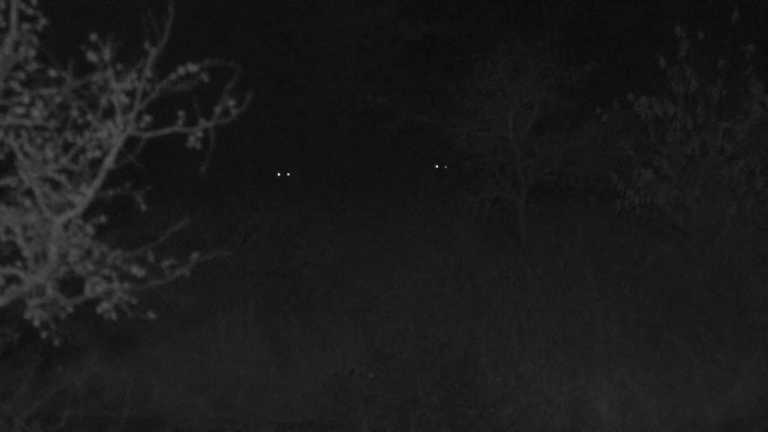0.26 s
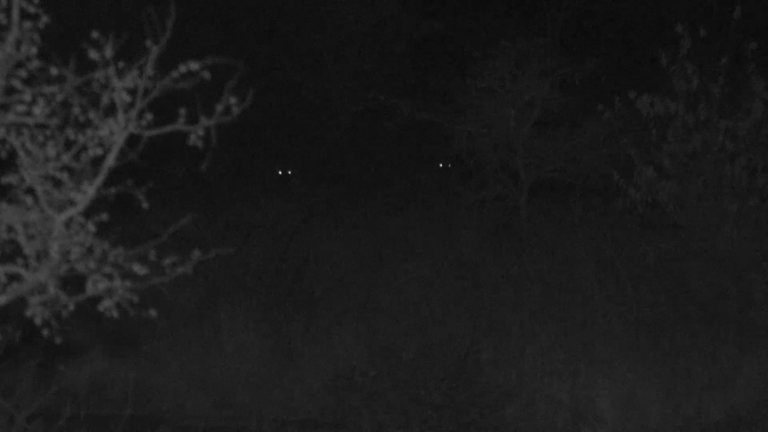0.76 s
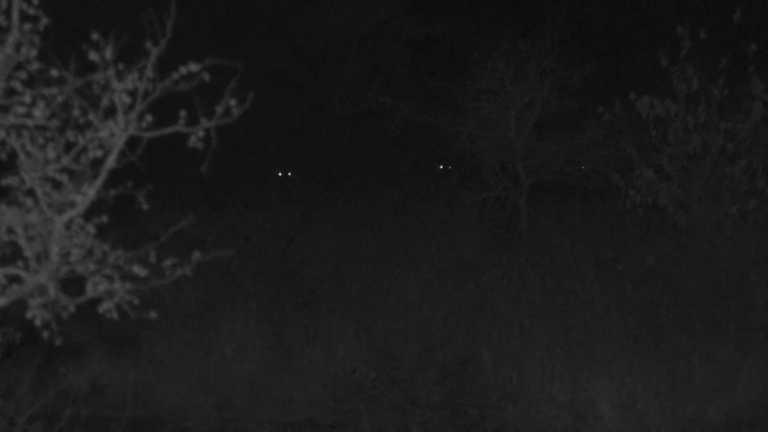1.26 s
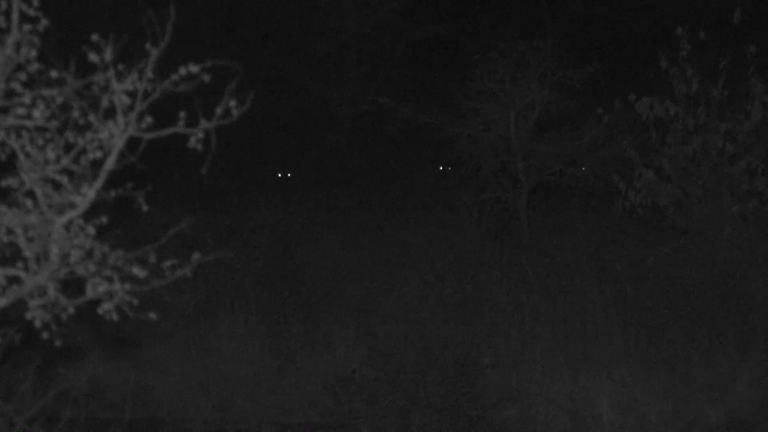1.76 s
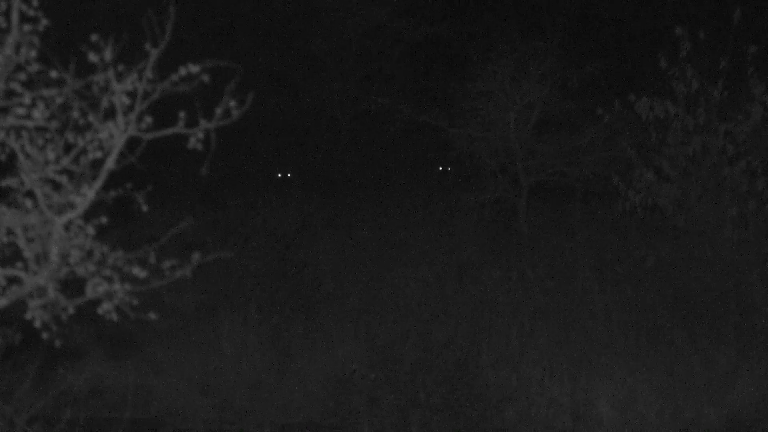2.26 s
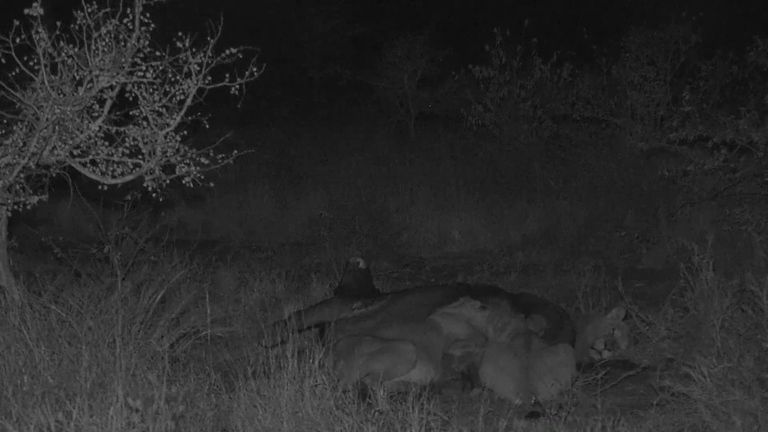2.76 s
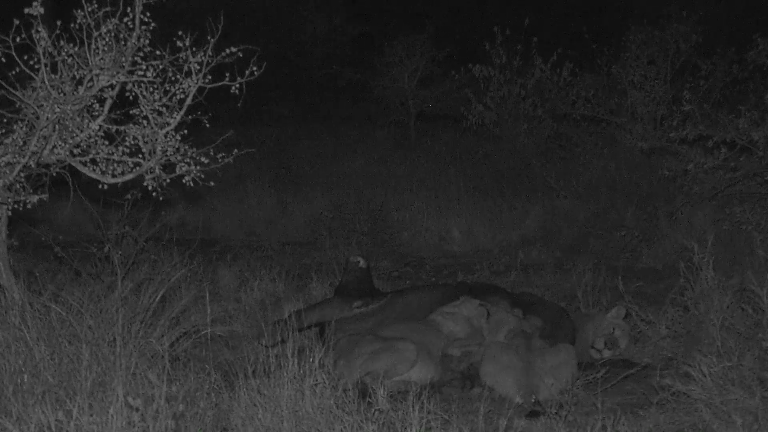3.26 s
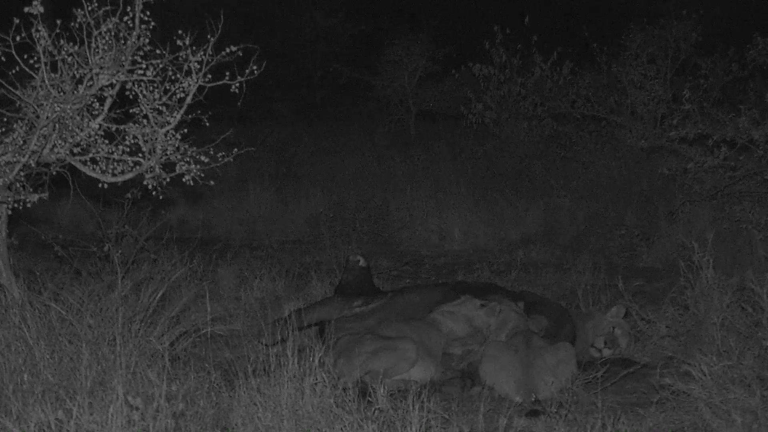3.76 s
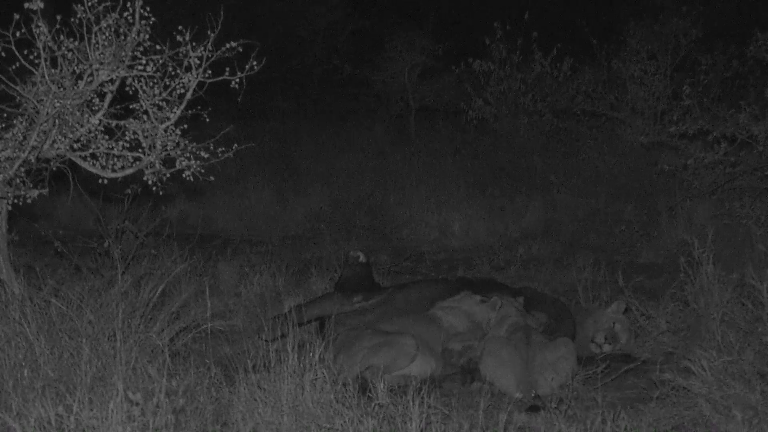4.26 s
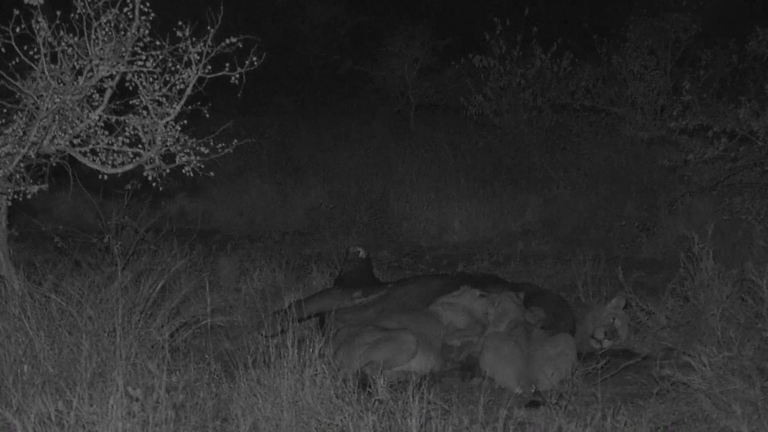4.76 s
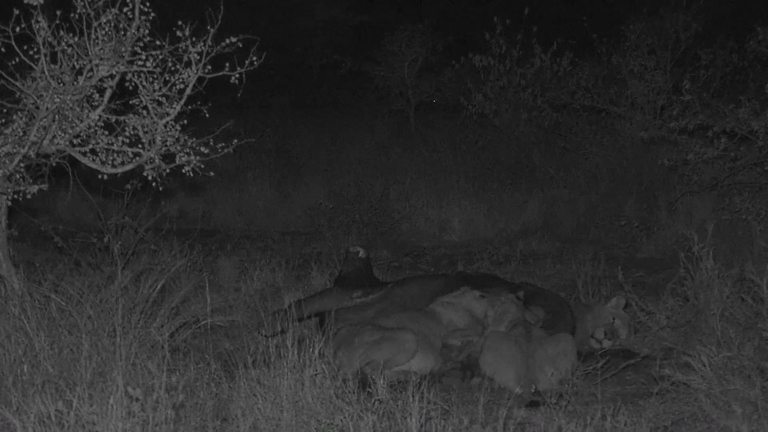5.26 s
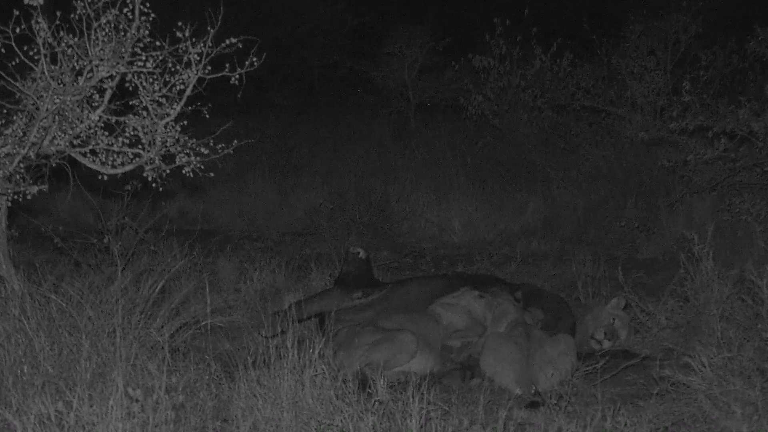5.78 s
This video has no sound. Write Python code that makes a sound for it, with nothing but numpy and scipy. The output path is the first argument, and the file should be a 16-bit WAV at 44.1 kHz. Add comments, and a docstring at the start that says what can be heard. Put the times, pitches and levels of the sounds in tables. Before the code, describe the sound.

Two hyenas call outdoors in the dark. The clear, strong whoops come at the start and again past the middle, each held and roughened before a fast upward sweep and abrupt stop, with a long diffuse echo from trees. Between and beneath them, quieter low groans rise and sink, the last one strongest. Crisp grass brushing and sharp little snaps sound near the microphone above a soft, dull background hiss.

```python
"""Two hyenas calling at night

In open bush one hyena whoops: long clear notes sweep up and break off, roughened by a second oscillation.
The other lows in arched groans, a buzz of partials shaped by its throat. Trees return echoes and a long tail.
Shaped noise makes the night air and the rustle of dry grass; short noise bursts make its stalks snap."""
import sys
import numpy as np
from scipy import signal
from scipy.io import wavfile
from scipy.ndimage import uniform_filter1d

SR = 44100
rng = np.random.default_rng(int(sys.argv[2]) if len(sys.argv) > 2 else 0)


def int16_out(signal):
    """Quantize to a 16-bit WAV file."""
    q = np.round(np.clip(np.atleast_2d(signal).T, -1, 1) * 32767)
    wavfile.write(sys.argv[1], SR, q.astype(np.int16))


N = 265526  # length in samples
LEAD = SR // 2  # run-up in samples: the first whoop is already sounding and has filled the tail
VOICE_SR = SR // 3  # voices are computed at this lower sample rate, Hz


def amp(db):
    """Turns decibels into a plain factor."""
    return 10 ** (np.asarray(db) / 20)


def unit(x):
    """Scales a sound to an rms of 1."""
    return x / np.sqrt(np.mean(x ** 2) + 1e-20)


def read(points, hz):
    """Reads a curve of (frequency, value) points, with frequency on a logarithmic scale."""
    point_hz, value = np.transpose(points)
    return np.interp(np.log(hz + 1), np.log(point_hz + 1), value)


def add(mix, start_s, sound):
    """Adds a sound to the mix at its start time, cutting it off at the end of the mix."""
    part = mix[LEAD + round(start_s * SR):][:len(sound)]
    part += sound[:len(part)]


def wander(size, hz, rate=VOICE_SR):
    """Smooth chance of rms 1: random numbers with changes faster than about hz filtered out."""
    step = 8  # one random number per 8 samples
    smooth = signal.butter(4, hz, fs=rate / step, output="sos")
    slow = signal.sosfilt(smooth, rng.standard_normal(size // step + 2))
    return unit(np.interp(np.arange(size) / step, np.arange(len(slow)), slow))


def shake(size, rasp_db, hz):
    """Rasp: irregular size (real part) and timing (imaginary part) of the vocal pulses."""
    return amp(rasp_db) * (wander(size, hz) + 1j * wander(size, hz))


def sounded(t, voice, fade_s):
    """Fades a voice in and out; returns its start time and its sound at the full sample rate."""
    edges = np.minimum(np.minimum(t - t[0], t[-1] - t) / fade_s, 1)
    return t[0], signal.resample_poly(voice.real * edges, SR // VOICE_SR, 1)


def whoop(rows, lead_s, fade_s, join_s, leave_s, slow_hz, full_db):
    """A clear tone; on the held note a second, slower oscillation adds sum and difference tones."""
    # How the throat favours some pitches. Each row: frequency in Hz, level in dB.
    whoop_throat = [(100, -36), (200, -13.5), (400, 8), (550, 10.5), (720, 5.5), (860, 15), (1070, 2.5),
                    (1250, -5.5), (1430, 5.5), (1600, -3.5), (1780, -8.5), (2150, -14), (2600, -29),
                    (3100, -35), (3500, -35.5), (4000, -37), (4400, -56), (5300, -48), (6200, -61)]
    # Sum and difference tones. Each entry: multiple of the slow oscillation, level in dB before coupling.
    side_tones = {-3: -10.5, -2: -3.5, -1: -5, 1: 0.29, 2: -26}
    join_ramp_s, leave_ramp_s, roughen_s = .06, .12, .3
    uncoupled_db = -36
    clear_rasp_db, join_rasp_db, double_rasp_db, sweep_rasp_db = -50, -42.5, -20, -15.5
    slow_lift_hz = 9.92  # the sweep pulls the slow oscillation up

    s, *columns = np.transpose(rows)
    t = np.arange(s[0] - lead_s, s[-1], 1 / VOICE_SR)
    hz, first_db, second_db, tilt_db = (np.interp(t, s, c) for c in columns)

    # The slow oscillation joins, then its side tones sink again as it leaves.
    joined = np.clip((t - join_s) / join_ramp_s, 0, 1)
    roughened = np.clip((t - join_s) / roughen_s, 0, 1)
    swept = np.clip((t - leave_s) / leave_ramp_s, 0, 1)
    couple_db = uncoupled_db + (full_db - uncoupled_db) * joined * (1 - swept)

    # The rasp builds after the joining and grows once more with the sweep.
    rasp_db = clear_rasp_db + (join_rasp_db - clear_rasp_db) * joined
    rasp_db = rasp_db + (double_rasp_db - join_rasp_db) * roughened
    rasp_db = rasp_db + (sweep_rasp_db - double_rasp_db) * swept
    rasp = shake(len(t), rasp_db, 65.5)

    # Both oscillations waver slightly in pitch.
    slow_hz = slow_hz + slow_lift_hz * swept
    fast_turns = np.cumsum(hz * (1 + 0.0028 * wander(len(t), 21.7))) / VOICE_SR
    slow_turns = np.cumsum(slow_hz * (1 + 0.005 * wander(len(t), 8.4))) / VOICE_SR
    fast, slow = np.exp(2j * np.pi * fast_turns), np.exp(2j * np.pi * slow_turns)

    voice = amp(first_db) * fast * (1 + rasp)
    base_db = second_db - read(whoop_throat, 2 * hz)  # the second partial sets the level of the rest
    sides = {n: slow ** n for n in (0, *side_tones)}
    multiple = np.ones(len(t))  # the fast oscillation raised to the power k
    for k in range(13):
        patchy_db = 0.87 * np.sqrt(k) * wander(len(t), 8.6)  # the higher partials come and go
        for n, side_db in {0: 0, **side_tones}.items():
            line_hz = k * hz + n * slow_hz
            if (k, n) != (1, 0) and line_hz.min() > 0:  # the first partial is already there
                line_db = base_db + read(whoop_throat, line_hz) + tilt_db * np.log2(line_hz / hz / 2)
                line_db = line_db + patchy_db * (k > 2) + (side_db + couple_db) * (n != 0)
                phase = np.exp(2j * np.pi * rng.random())
                line = amp(line_db) * (line_hz < 6500) * multiple * sides[n] * phase
                # Each tone takes the rasp at its own time shift, and more of it up high.
                voice = voice + line * (1 + 0.97 * k * np.roll(rasp, 300 * (k + 13 * n)))
        multiple = multiple * fast
    return sounded(t, np.sqrt(2) * voice, fade_s)


def partials(hz, turns, throat, tilt_db, odd_db, rasp, key, count):
    """Multiples of hz through the throat, tilted about multiple key; rasp shakes each pulse, more so up high."""
    out = 0
    for k in range(1, count + 1):
        db = read(throat, k * hz) + tilt_db * np.log2(k / key) + odd_db * (k % 2)
        db = db + 3.94 * wander(len(hz), 6.94) * (k > 3)  # the higher partials come and go
        tone = np.exp(2j * np.pi * (k * turns + rng.random()))
        out = out + amp(db) * tone * (1 + rasp * np.sqrt(k / key)) * (k * hz < 6000)
    return np.sqrt(2) * out


def groan(rows, taut_tilt_db):
    """A low buzz, its second partial favoured by the throat; slack folds rasp, and odd partials can fade."""
    # How the throat favours some pitches. Each row: frequency in Hz, level in dB.
    groan_throat = [(80, -17), (150, -22), (220, -2.5), (300, 6), (420, -11), (600, -26.5), (750, -30.5),
                    (900, -14.5), (1000, -14), (1100, -12), (1200, -27), (1400, -35), (1750, -34.5),
                    (2200, -56), (6000, -51)]
    slack_hz, taut_hz = 81, 146  # the creaky ends and the full pitch
    slack_tilt_db = 4  # brightness of the creaky ends, dB per octave
    slack_rasp_db, taut_rasp_db = -17, -35.5
    close_hz, close_span_hz, close_tilt_db = 88.5, 6.5, -9  # tilt change in dB per octave

    s, *columns = np.transpose(rows)
    t = np.arange(s[0], s[-1], 1 / VOICE_SR)
    hz, effort_db, odd_db = (np.interp(t, s, c) for c in columns)
    taut = np.clip((hz - slack_hz) / (taut_hz - slack_hz), 0, 1)
    tilt_db = slack_tilt_db + (taut_tilt_db - slack_tilt_db) * taut
    rasp_db = slack_rasp_db + (taut_rasp_db - slack_rasp_db) * taut

    # Past the highest pitch, as the groan sinks low, the mouth closes and the sound darkens.
    closing = np.clip((close_hz - hz) / close_span_hz, 0, 1) * (t > t[hz.argmax()])
    tilt_db = tilt_db + close_tilt_db * closing

    turns = np.cumsum(hz * (1 + 0.0041 * wander(len(t), 20.5))) / VOICE_SR
    rasp = shake(len(t), rasp_db, 74)
    voice = partials(hz, turns, groan_throat, tilt_db, odd_db, rasp, key=2.4, count=22)
    return sounded(t, amp(effort_db) * voice, 0.046)


def bush(x, wet_db):
    """Scattering from trees: a diffuse tail that builds up and dies away, and a few smeared echoes."""
    # The tail by pitch. Each row: frequency in Hz, time to fall by 60 dB in seconds, relative level in dB.
    tail_colour = np.array([(199, 1.2, -4), (386, 2.17, -3.5), (850, 2.7, 0), (1360, 2.37, 0.5),
                            (1790, 1.94, 0.5), (2650, 1.53, 6.5), (3600, 1.73, 4), (6100, 1.2, 0)])
    # Echoes. Each row: delay in seconds, level in dB before the wet level and a common lift are added.
    echo_list = [(0.078, -18.5), (0.138, -35), (0.364, -26.5), (.62, -40)]
    build_s, smear_s, echo_lift_db = 0.011, 0.0031, 14
    size = 2 * SR

    # One click of random sign at a random place in every 20 samples.
    taps = np.zeros(size)
    at = np.arange(0, size, 20)
    taps[at + rng.integers(0, 20, len(at))] = rng.choice([-1., 1.], len(at))

    hz, t, z = signal.stft(taps, SR, nperseg=512)
    t60 = read(tail_colour[:, [0, 1]], hz)[:, None]
    colour_db = read(tail_colour[:, [0, 2]], hz)[:, None]
    z = z * amp(colour_db - 60 * t / t60) * (1 - np.exp(-t / build_s))
    tail = signal.istft(z, SR, nperseg=512)[1][:size]
    tail = amp(wet_db) * tail / np.linalg.norm(tail)

    age = np.arange(size) / SR
    for delay_s, db in echo_list:
        clump = taps * np.exp(-((age - delay_s) / smear_s) ** 2)
        tail = tail + amp(db + wet_db + echo_lift_db) * clump / np.linalg.norm(clump)
    return x + signal.fftconvolve(x, tail)[:len(x)]


def hiss(colour, patchy_db):
    """Noise of a given colour and rms 1, with patches of pitch and time that drift in level."""
    hz = np.fft.rfftfreq(512, 1 / SR)
    a, b, patches = rng.standard_normal((N // 128 + 5, 257, 3)).T
    patches = uniform_filter1d(patches, 10, 0)  # smooth across pitch
    patches = unit(uniform_filter1d(patches, 16, 1))  # smooth across time
    z = (a + 1j * b) * amp(read(colour, hz)[:, None] + patchy_db * patches)
    return unit(signal.istft(z, nperseg=512, noverlap=384)[1][:N])


def night():
    """The steady background of the night: coloured noise."""
    # Colour of the noise. Each row: frequency in Hz, relative level in dB per Hz.
    night_colour = [(24, -49), (40, -15.5), (243, -4), (412, -2.5), (680, -6), (918, -5.5), (1210, -10),
                    (2700, -14.5), (6650, -21), (9220, -23), (16000, -24)]
    night_db = -58.5
    return amp(night_db) * hiss(night_colour, 1.44)


def grass():
    """Brushed stalks: hiss that swells, sprinkled with tiny crackles."""
    # Colour of the hiss. Each row: frequency in Hz, relative level in dB per Hz.
    grass_colour = [(1500, -19), (2500, -9.5), (3500, -9.5), (4400, -4), (5300, -5), (6100, -3), (7200, -4),
                    (9200, 0), (10600, -3), (11600, -11.5), (13200, -14), (14300, -21), (16000, -10.5)]
    # Brushes. Each row: peak time in seconds, peak level in dB, rise in seconds, fall in seconds.
    brush_list = [(.03, -59, 0.009, 0.011), (.12, -60, 0.034, 0.035), (.32, -60, 0.07, .2),
                  (1.24, -68.5, 0.07, 0.37), (2.09, -60.5, 0.026, 0.025), (2.16, -68, 0.032, .03),
                  (2.36, -49, 0.077, 0.053), (2.44, -50.5, .05, 0.089), (2.72, -59.5, .03, .12),
                  (3.07, -55, 0.11, 0.18), (3.26, -59.5, 0.057, 0.076), (3.55, -62.5, 0.21, 0.27),
                  (3.82, -56.5, 0.12, 0.22), (4.02, -51.5, 0.16, 0.095), (4.22, -52.5, 0.092, .1),
                  (4.43, -53, .1, 0.036), (4.66, -51.5, 0.065, .05), (4.93, -56, .3, 0.48),
                  (5.33, -52.5, 0.057, 0.06), (5.54, -50.5, .02, 0.07), (5.64, -47.5, 0.065, 0.12),
                  (5.83, -46.5, 0.026, 0.12)]
    still_db = -69.5  # level between brushes
    drop_db = -7.5  # change one rise or fall away from a peak
    ticks_per_s, tick_decay_s = 250, 0.00088

    t = np.arange(N) / SR
    power = amp(2 * still_db)  # twice the dB gives power
    for peak_s, db, rise_s, fall_s in brush_list:
        distance = np.maximum((peak_s - t) / rise_s, (t - peak_s) / fall_s)
        power = power + amp(2 * (db + drop_db * distance))

    ticks = amp(6.17 * np.minimum(rng.exponential(1, N), 5)) * (rng.random(N) < ticks_per_s / SR)
    crackle = signal.lfilter([1], [1, -np.exp(-1 / (tick_decay_s * SR))], ticks)
    flicker = amp(0.41 * wander(N, 10.2, SR))
    rustle = unit(hiss(grass_colour, 0.97) * flicker * (1 + 0.13 * crackle))
    return np.sqrt(power) * rustle


def snaps():
    """Dry stalks snap: each is a dying burst of noise leaning toward its own pitch."""
    # Each row: start in seconds, peak level in dB, centre in Hz, time to fall by 60 dB in seconds.
    snap_list = [(1.106, -49, 11200, 0.013), (1.3332, -47.5, 9670, 0.012), (2.138, -41.5, 9420, 0.012),
                 (2.1643, -34, 10190, 0.011), (2.3477, -25, 6140, 0.0097), (2.3552, -33, 9000, 0.014),
                 (2.3964, -46, 8810, 0.011), (2.4179, -29, 8650, 0.021), (2.7135, -44, 9150, 0.012),
                 (2.766, -42.5, 10100, 0.012), (4.0514, -44, 6300, 0.012), (5.1388, -38.5, 6705, 0.012),
                 (5.5268, -54, 9000, 0.01), (5.6086, -38, 8300, 0.01), (5.6187, -32, 10000, 0.01),
                 (5.668, -21, 5050, 0.0096), (5.8024, -35, 8740, 0.009), (5.8305, -30, 6690, 0.01),
                 (5.845, -39, 10170, 0.012), (5.8986, -39, 8960, 0.01)]
    size = 1500
    out, t = np.zeros(N + LEAD), np.arange(size) / SR
    band = signal.butter(3, [3300, 12000], "band", fs=SR, output="sos")
    noises = rng.standard_normal((len(snap_list), size))
    for (start_s, db, hz, t60), noise in zip(snap_list, noises):
        burst = noise * amp(-60 * t / t60)
        ring = signal.lfilter(*signal.iirpeak(hz, .8, fs=SR), burst)
        ring = signal.sosfilt(band, ring)
        add(out, start_s, amp(db) * ring / abs(ring).max())
    return out[LEAD:]


def scene():
    """Both hyenas call among the trees, over the night noise, the rustling grass and its snaps."""
    # One list per whoop. Each row: time in seconds, pitch in Hz, first partial in dB, second partial in dB,
    # brightness in dB per octave.
    whoop_list = [
        [(0.04, 366, -26, -50.5, -5), (0.12, 370.5, -26.5, -49.5, -5.5), (0.2, 389.2, -28, -43.5, -5),
         (0.25, 434.7, -29.5, -26.5, -8), (0.284, 491.3, -31, -39.5, -7.5), (0.368, 615.4, -36.5, -36.5, -10),
         (0.458, 834.6, -36, -39, -6), (0.51, 861, -34.5, -34.5, 6.5), (0.526, 815, -38, -51, 5),
         (0.548, 591, -30, -55, 8), (0.58, 398.6, -50, -58, 3)],
        [(3.08, 260.3, -59, -57, -3), (3.128, 257, -51, -55.5, -6), (3.25, 274.7, -42.5, -47.5, -5),
         (3.332, 303.6, -37.5, -47, -9.5), (3.39, 345, -29.5, -51, 4), (3.514, 357.6, -25, -55, 7.5),
         (3.62, 364.9, -25.5, -54.5, 0.2), (3.712, 369.2, -23.5, -52, 0.5), (3.856, 374.4, -25.5, -50, -2.5),
         (3.95, 385.7, -28, -48, -4), (4.0, 393, -24.5, -46, -3), (4.07, 428, -27, -29, -8),
         (4.216, 589.6, -35.5, -41, -1), (4.284, 711, -41, -35.5, -1), (4.348, 840, -33, -29.5, -3.5),
         (4.41, 891.5, -37.5, -28, -1.5), (4.44, 811, -32.5, -36, 3), (4.462, 599, -28.5, -50, 10),
         (4.49, 419, -34, -44, 7)],
    ]
    # Each row, one per whoop: run-up in seconds, fade in seconds, time the second oscillation joins in seconds,
    # time it leaves in seconds, its pitch in Hz before the sweep lifts it, its coupling in dB.
    stage_list = [(.5, 0.018, -1, 0.19, 169.5, 1), (0, .013, 3.5, 4.01, 163.5, 2.5)]
    # One list per groan. Each row: time in seconds, pitch in Hz, effort in dB, lift of odd partials in dB.
    groan_list = [
        [(0, 126.2, -51, 1), (.07, 100.9, -55, 3), (.17, 83.4, -59.5, 1.5), (.3, 79.5, -63.5, 6.5),
         (.42, 72, -61, 1), (.5, 61.83, -58, -4)],
        [(0.92, 72.75, -57, 4), (0.992, 82, -62, 2.5), (1.086, 118, -48.5, 0), (1.146, 140.3, -46, .6),
         (1.302, 148.1, -50, -9), (1.364, 141.9, -50, -2), (1.498, 145.9, -50, 1), (1.618, 139.7, -47.5, -0.3),
         (1.71, 120.2, -51.5, -5.5), (1.785, 90, -55, 2.5), (1.9, 67.5, -66, 2)],
        [(2.34, 73.75, -54.5, -1), (2.444, 88.6, -65, 9.5), (2.516, 114, -52, 2.5), (2.552, 136.6, -46.5, -2),
         (2.578, 148.6, -46.5, 0), (2.798, 155.4, -43, -5.5), (2.904, 140.5, -47.5, 1.5),
         (3.03, 110.1, -51.5, -4), (3.11, 97.9, -52, -0.5), (3.2, 89.6, -61.5, 4.5), (3.36, 81.9, -54.5, 0.5),
         (3.46, 72.2, -57, 0)],
        [(3.9, 76.05, -52.5, 1), (4.006, 99.35, -49.5, -5.5), (4.128, 134.3, -46, 0), (4.158, 139, -46, -9),
         (4.366, 141.9, -49.5, -17), (4.484, 148.5, -42, -5), (4.6, 135, -42.5, 1.5), (4.722, 92.36, -56, 1),
         (4.806, 71.3, -66, 10), (4.86, 63.5, -60, -1)],
        [(5.3, 78.2, -49.5, -8), (5.376, 87.35, -58.5, 5.5), (5.442, 108.8, -54.5, 9), (5.496, 130.6, -47, 6),
         (5.53, 148.7, -43.5, 1.5), (5.57, 153.4, -41.5, -30), (5.63, 163.2, -37, -10),
         (5.718, 166.6, -35.5, -32), (5.83, 153, -44, -35), (5.88, 141.2, -43, -1), (5.968, 111, -51, 1),
         (6.02, 103.5, -45, 4.5)],
    ]
    # Brightness of each groan at full pitch, in dB per octave.
    groan_tilts = [2, 3.6, 2.45, 1.52, 0.86]

    whooper, groaner = np.zeros((2, N + LEAD))
    for rows, stages in zip(whoop_list, stage_list):
        add(whooper, *whoop(rows, *stages))
    for rows, tilt_db in zip(groan_list, groan_tilts):
        add(groaner, *groan(rows, tilt_db))
    voices = bush(whooper, wet_db=-11.5) + bush(groaner, wet_db=-20.0)
    return (voices[LEAD:] + night() + grass() + snaps())[None]


def record(dry):
    """The microphone weakens deep bass; then a steep filter removes the very top."""
    mic_low_hz, top_hz = 105, 15850
    thin = signal.sosfilt(signal.butter(2, mic_low_hz, "high", fs=SR, output="sos"), dry)
    edge = signal.firwin(513, top_hz, window=("kaiser", 9.), fs=SR)
    return signal.oaconvolve(thin, edge[None], "same")


dry = scene()
out = record(dry)
int16_out(out)
```